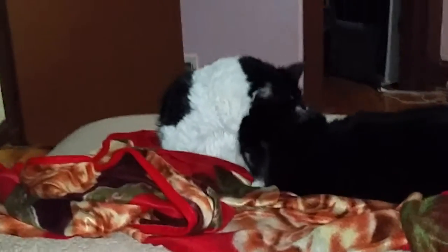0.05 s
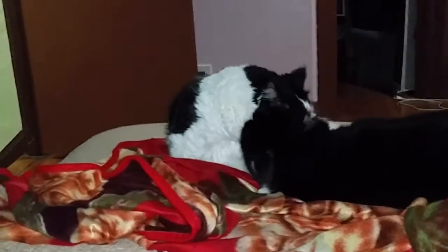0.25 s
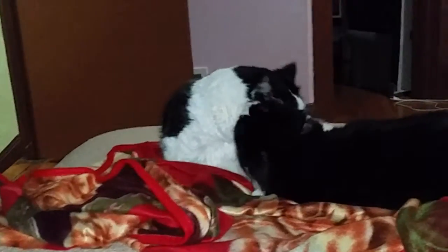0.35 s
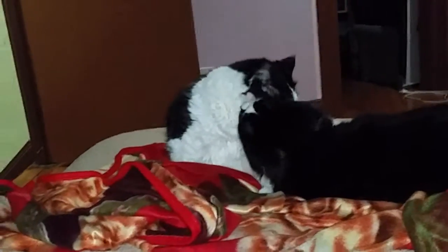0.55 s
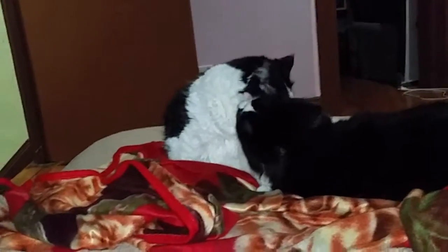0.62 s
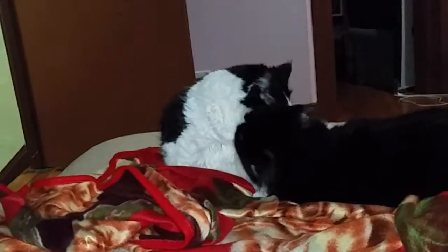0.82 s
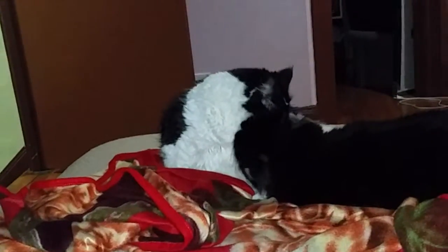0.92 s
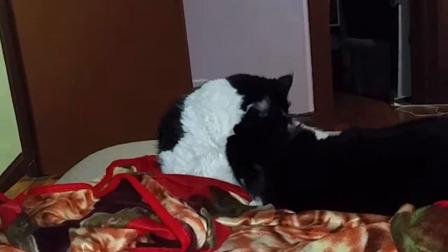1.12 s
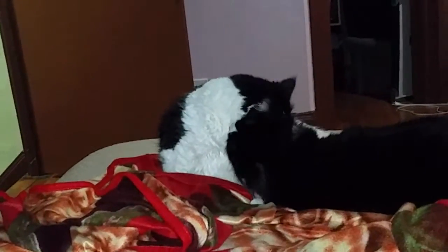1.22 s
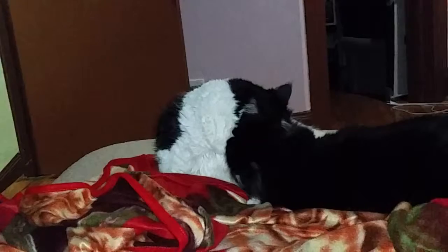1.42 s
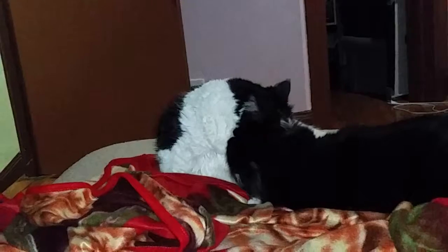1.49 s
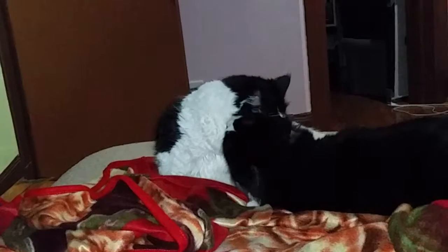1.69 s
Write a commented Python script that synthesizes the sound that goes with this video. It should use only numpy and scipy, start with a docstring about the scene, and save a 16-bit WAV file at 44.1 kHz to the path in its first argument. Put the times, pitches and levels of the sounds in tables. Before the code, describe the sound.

Soft low thumps from a handled microphone, with faint cloth rustling in a quiet room.

```python
"""A quiet room where two cats nuzzle on a blanket, heard from a hand-held phone that is being moved.
Air and handling push on one microphone opening or the other, making soft thumps and a weak flutter.
Cloth slides in two swells as its tiny fibres slip, then trails off in a thin sizzle.
Two tiny brushes of fur or cloth follow near the end. A low room rumble lies under it all."""
import sys
import numpy as np
from scipy import signal
from scipy.fft import rfft, irfft
from scipy.io import wavfile
from scipy.ndimage import uniform_filter1d

SR = 44100
rng = np.random.default_rng(int(sys.argv[2]) if len(sys.argv) > 2 else 0)


def transcribe(signal):
    """Save signal, clipped to [-1, 1], as a 16-bit WAV file at the path in sys.argv[1]."""
    frames = np.atleast_2d(signal).T
    limited = np.clip(frames, -1, 1)
    pcm = np.round(limited * 32767).astype(np.int16)
    wavfile.write(sys.argv[1], SR, pcm)


N = 77175  # 1.75 seconds


def gain(db):
    """Turn decibels into a number to multiply a sound by."""
    return 10 ** (np.asarray(db) / 20)


def normalise(x):
    """Scale a sound so its average strength (rms) is 1."""
    return x / np.sqrt(np.mean(x ** 2))


def fade(points):
    """Join (time_s, level_db) points into a gain that changes over time."""
    return gain(np.interp(np.arange(N) / SR, *np.array(points).T))


def db_by_pitch(points):
    """Join (pitch_hz, level_db) points into a level for every pitch."""
    hz, db = np.array(points).T
    return np.interp(np.log(np.fft.rfftfreq(N, 1 / SR) + 0.00061), np.log(hz), db)


def shape_noise(noise, tone, balance=None):
    """Make each pitch of a noise louder or softer, and lean it left or right."""
    db = db_by_pitch(tone)
    if balance is not None:
        db = db + db_by_pitch(balance) * np.array([[.5], [-.5]])
    return normalise(irfft(rfft(noise) * gain(db), N))


def pan(left_minus_right_db):
    """Left and right gains: the farther side is turned down."""
    return gain(np.array([[min(left_minus_right_db, 0)], [min(-left_minus_right_db, 0)]]))


def wobble(depth_db, per_s):
    """A gain that drifts smoothly up and down at random."""
    step = int(SR / per_s)
    steps = np.repeat(rng.standard_normal(N // step + 1), step)
    return gain(depth_db * normalise(uniform_filter1d(steps, step)[:N]))


def room():
    """The room's air gives a swaying rumble, one droning note and a faint hiss."""
    # Tone of the room, mostly bass: pitch_hz, relative_db
    room_tone = [(20, -3.5), (45, 6.5), (80, -1), (125, 2), (170, -4), (210, -12.5), (290, -10),
                 (420, -15.5), (700, -25.5), (1150, -30), (1700, -37.5), (3000, -44), (7000, -50.5),
                 (9200, -50.5), (10600, -42.5), (12200, -43), (14500, -41)]
    # Which side each pitch leans to: pitch_hz, left_minus_right_db
    balance = [(20, -3.5), (400, -1.5), (1200, 2.5), (4000, -1), (10500, 0), (15000, 1)]
    # Rise and fall of the rumble: time_s, change_db
    sway = [(0, -1), (.5, 2.5), (.9, -1), (1.0, -4), (1.2, -1.5), (1.4, 0), (1.52, 5), (1.62, -1.5),
            (1.75, -0.5)]
    room_db, bass_below_hz = -61, 203
    drone_db, drone_hz, drone_width_hz = -70, 178.8, 14
    shared = 0.43  # share of the noise power that both sides have in common
    hz = np.fft.rfftfreq(N, 1 / SR)
    air = np.sqrt(1 - shared) * rng.standard_normal((2, N)) + np.sqrt(shared) * rng.standard_normal(N)
    noise = shape_noise(air, room_tone, balance)
    bass = irfft(rfft(noise) * (hz < bass_below_hz), N)
    swaying_bass = bass * fade(sway) * wobble(depth_db=-1, per_s=8)
    drone = normalise(irfft(rfft(air) / (1 + ((hz - drone_hz) / drone_width_hz) ** 2), N))
    return gain(room_db) * (noise - bass + swaying_bass) + gain(drone_db) * drone


def fibres(slips_per_s=9800, spread_db=11.5):
    """Fibres slip in thousands of tiny, uneven clicks, different on each side."""
    slips = rng.random((2, N)) < slips_per_s / SR
    return slips * rng.standard_normal((2, N)) * gain(spread_db * rng.random((2, N)))


def brushes():
    """A light touch of fur or cloth makes a short, soft burst of slipping fibres."""
    # Bursts: middle_s, level_db, half_length_s, pitch_hz, width_hz, left_minus_right_db
    bursts = [(0.377, -70, 0.0061, 11900, 3000, 24), (1.561, -72.5, 0.01, 12100, 2430, 10),
              (1.563, -87, 0.011, 1700, 1800, 3), (1.605, -78.5, 0.0097, 2090, 596, 4),
              (1.606, -75.5, 0.0066, 1140, 500, 1.5)]
    t, hz = np.arange(N) / SR, np.fft.rfftfreq(N, 1 / SR)
    out = np.zeros((2, N))
    for middle_s, level_db, half_length_s, pitch_hz, width_hz, side_db in bursts:
        band = 1 / (1 + (2 * (hz - pitch_hz) / width_hz) ** 2)
        rustle = normalise(irfft(rfft(fibres()) * band, N))
        swell = np.exp(-.5 * ((t - middle_s) / half_length_s) ** 2)
        out += gain(level_db) * pan(side_db) * rustle * swell
    return out


def sizzle():
    """Fibres slipping close to the left microphone make a thin, flickering sizzle."""
    # Loudness of the sizzle: time_s, level_db
    levels = [(0, -104), (.2, -86.5), (.42, -85), (.475, -72.5), (.51, -83), (.68, -79.5), (.715, -73),
              (.82, -73), (.88, -74), (.97, -72.5), (1.0, -78.5), (1.06, -77), (1.19, -79), (1.22, -81),
              (1.3, -82.5), (1.75, -86)]
    # Its tone, nearly all high treble: pitch_hz, relative_db
    tone = [(5000, -68), (8200, -26), (9200, -22), (9700, -13), (10450, -11), (11150, -9), (11850, 2.5),
            (12450, 5.5), (12900, -5.5), (13600, -8.5), (14400, -15.5)]
    hiss = shape_noise(fibres(), tone)
    return hiss * fade(levels) * wobble(depth_db=1.6, per_s=42) * pan(left_minus_right_db=12.5)


def sliding_cloth(treble_above_hz=2000, brightening=0.17):
    """Cloth rubs in two swells, louder and brighter when it slides faster."""
    # Loudness of the slide, standing for its speed: time_s, level_db
    levels = [(0, -101), (.07, -77.5), (.125, -73.5), (.25, -64), (.37, -62.5), (.45, -68), (.52, -68.5),
              (.6, -68), (.68, -68.5), (.8, -71.5), (.92, -75), (1.05, -82), (1.3, -88), (1.5, -80),
              (1.62, -81), (1.75, -83)]
    # Tone of the rubbing: pitch_hz, relative_db
    tone = [(200, -7), (450, 10.5), (720, 2), (1000, 1), (1300, 1), (1650, -8.5), (2300, -8.5), (3200, -17),
            (4500, -18), (6500, -30.5), (8100, -23), (9000, -32), (10500, -21.5), (12200, -15.5),
            (14500, -18)]
    # Which side each pitch leans to: pitch_hz, left_minus_right_db
    balance = [(200, 6), (1200, 4), (4000, -2), (7000, -2), (10000, 18), (15000, -6.5)]
    rub = shape_noise(fibres(), tone, balance)
    speed = fade(levels)
    body = signal.sosfiltfilt(signal.butter(2, treble_above_hz, fs=SR, output="sos"), rub)
    treble = (rub - body) * (speed / speed.max()) ** brightening
    return (body + treble) * speed * wobble(depth_db=1.44, per_s=35)


def air_flutter(top_hz=185, bottom_hz=30):
    """As the phone moves, weak swirls of air flutter separately at each microphone opening."""
    # Flutter on the left: time_s, level_db
    left_levels = [(0, -66), (.1, -69), (.15, -46), (.25, -52), (.35, -47.5), (.41, -53.5), (.46, -59.5),
                   (.58, -53), (.67, -48.5), (.73, -61.5), (.9, -61.5), (1, -75.5), (1.75, -75.5)]
    # Flutter on the right: time_s, level_db
    right_levels = [(0, -73), (.06, -60), (.1, -48.5), (.22, -45.5), (.33, -49.5), (.4, -55.5),
                    (.45, -71.5), (.54, -58), (.64, -54), (.72, -56), (.82, -60.5), (.93, -78),
                    (1.75, -76.5)]
    noise = rng.standard_normal((2, N))
    swirls = signal.sosfilt(signal.butter(4, top_hz, fs=SR, output="sos"), noise)
    swirls = signal.sosfilt(signal.butter(1, bottom_hz, "high", fs=SR, output="sos"), swirls)
    return normalise(swirls) * np.array([fade(left_levels), fade(right_levels)])


def case_tap():
    """The phone's case rings for a few milliseconds when tapped."""
    # Notes of the case: pitch_hz, relative_db, ring_s (time to fade by 60 dB)
    notes = [(916, 3.5, 0.013), (1260, 3, 0.006), (1670, -14, 0.0043)]
    t = np.arange(N) / SR
    return sum(gain(db) * np.sin(2 * np.pi * pitch_hz * t) * np.exp(-np.log(1000) * t / ring_s)
               for pitch_hz, db, ring_s in notes)


def air_push(t, build_s, steepness=1.75, release_share=0.68):
    """Moving air makes suction that builds until t = 0, then lets go faster."""
    build = np.clip(1 + t / build_s, 0, 1) ** steepness
    release = np.clip(t / (build_s * release_share), 0, 1)
    return -np.sin(np.pi / 2 * build) * np.cos(np.pi / 2 * release) ** 2


def microphone_opening(pressure, leak_hz=88, resonance=1, bass_cut_hz=22):
    """The opening lets slow pressure leak away, so each push swings back once or twice."""
    s = 1j * np.fft.rfftfreq(N, 1 / SR)  # frequency, in the form that filter formulas use
    leak = s ** 2 / (s ** 2 + s * leak_hz / resonance + leak_hz ** 2)
    bass_cut = s / (s + bass_cut_hz)
    return irfft(rfft(pressure) * leak * bass_cut, N)


def thumps():
    """Pushes of air and handling thump, mostly on one side; the hardest also tap the case."""
    # Pushes on the microphone openings: time_s, level_db, build_ms, left_minus_right_db
    pushes = [(0.0746, -38, 3.3, -36), (.0828, -33, 4.9, -48), (0.1008, -57, 2.3, -14),
              (0.1221, -34.5, 3.2, -28), (0.14, -42.5, 3.0, 21), (0.166, -41, 6.1, -4),
              (0.2017, -28, 3.6, -38.5), (.209, -40, 4.4, 2.5), (0.2134, -32.5, 3.9, -23),
              (.234, -17, 3.29, 21), (0.2535, -40, 11, -27), (0.295, -42, 4.4, -12),
              (0.311, -38, 6.6, -15.5), (0.323, -43, 9.4, 4), (0.344, -32, 3.6, -31.5),
              (0.3806, -8.5, 3.15, 37), (0.3846, -22, 3.5, 9.5), (.569, -33, 5.2, -36),
              (0.6101, -31.5, 4.6, -30), (.621, -31.5, 3.04, -19), (0.6278, -29.5, 3.16, -24),
              (.641, -34.5, 4.1, -24), (0.6614, -25.5, 3.1, -19.5), (0.6825, -37, 6.3, -14),
              (0.753, -44, 7.9, -10.5), (0.888, -48, 3.7, -2)]
    rebound_s, rebound_share = .006, .13
    tap_above_db, tap_offset_db, tap_growth = -22, -36.5, 0.77
    muffle_above_hz = 2040
    t, tap = np.arange(N) / SR, case_tap()
    out = np.zeros((2, N))
    for time_s, level_db, build_ms, side_db in pushes:
        push = air_push(t - time_s, build_ms / 1000)
        rebound = rebound_share * air_push(t - time_s - rebound_s, build_ms / 1000)
        swing = microphone_opening(push + rebound)
        out += gain(level_db) * pan(side_db) * swing / np.abs(swing).max()
        if level_db > tap_above_db:
            timed_tap = np.interp(t - time_s, t, tap, left=0)
            out += gain(tap_offset_db + tap_growth * level_db) * pan(side_db) * timed_tap
    return signal.sosfilt(signal.butter(8, muffle_above_hz, fs=SR, output="sos"), out)


def scene():
    """Add all the sounds together in stereo."""
    return thumps() + air_flutter() + sliding_cloth() + sizzle() + brushes() + room()


def record(dry):
    """The phone cuts off the very highest treble."""
    top_hz = 14480
    return signal.sosfilt(signal.ellip(10, .2, 70, top_hz, fs=SR, output="sos"), dry)


dry = scene()
out = record(dry)
transcribe(out)
```